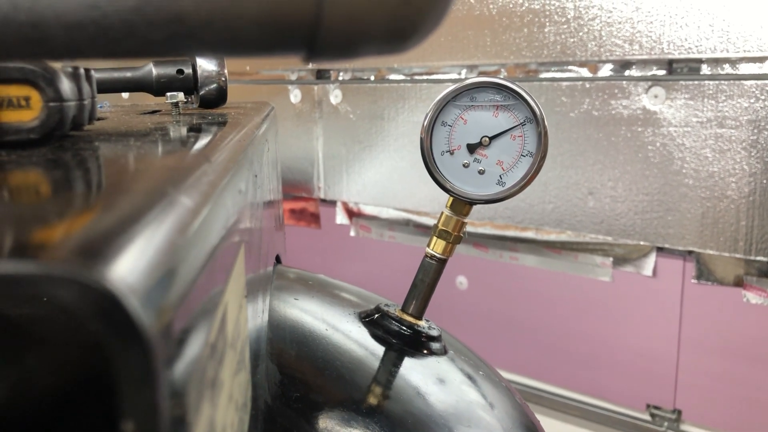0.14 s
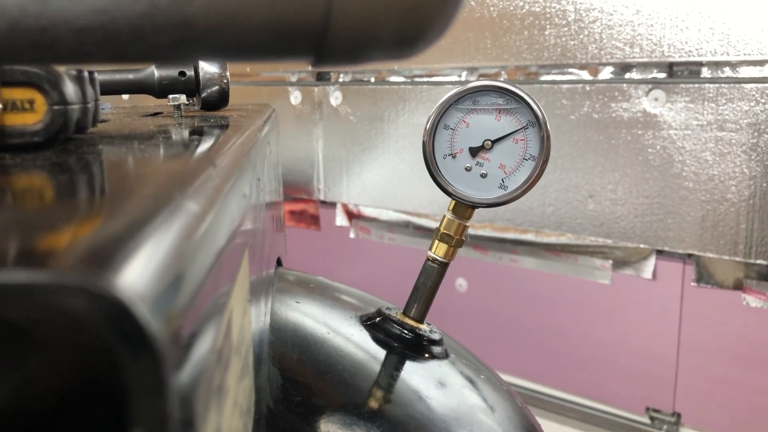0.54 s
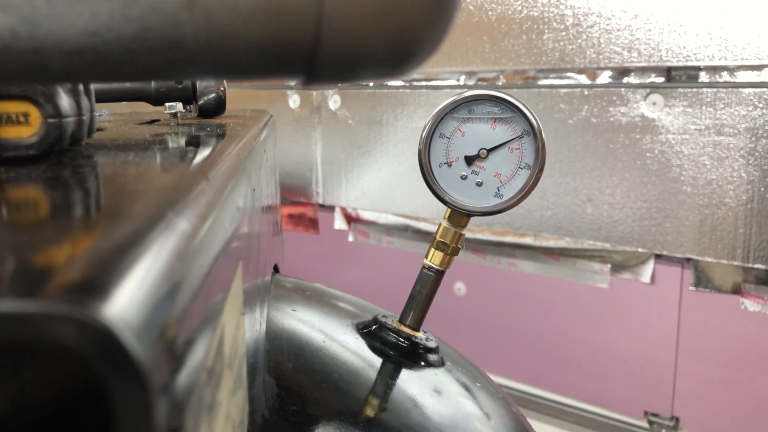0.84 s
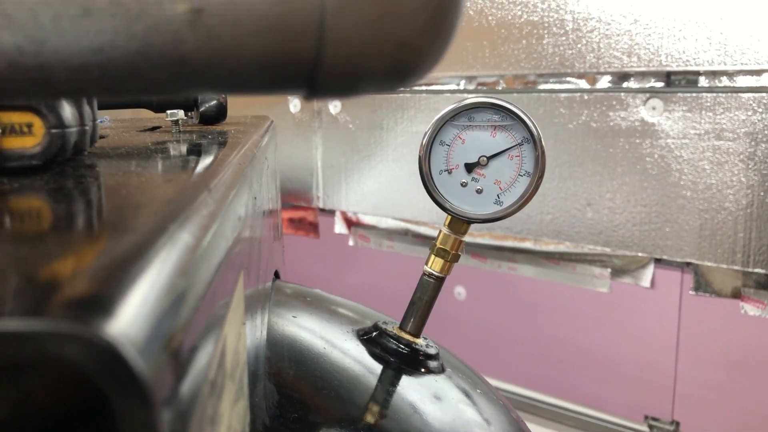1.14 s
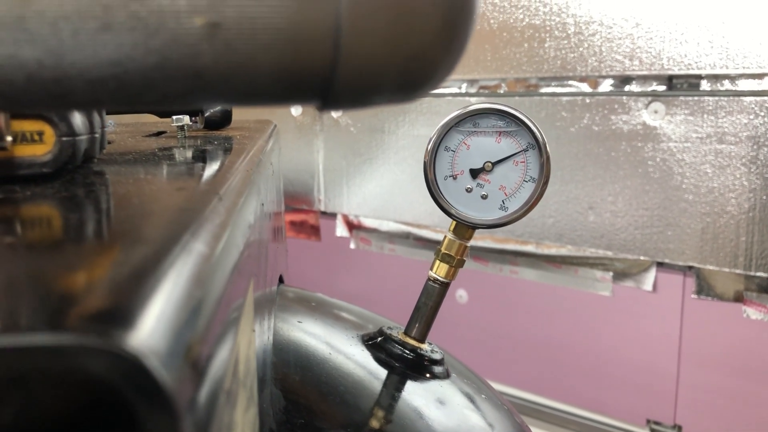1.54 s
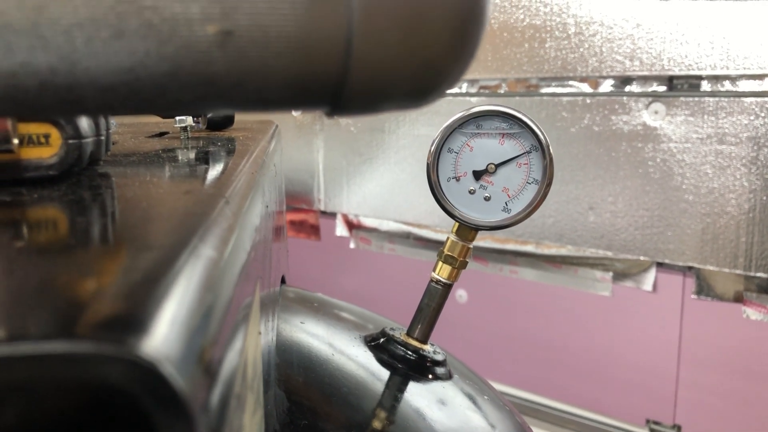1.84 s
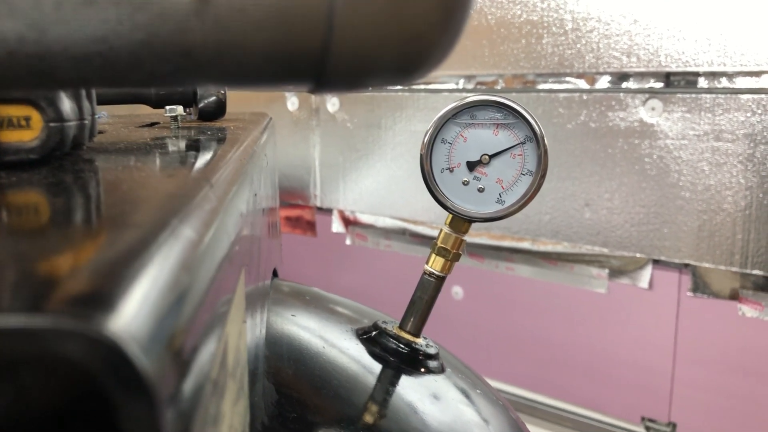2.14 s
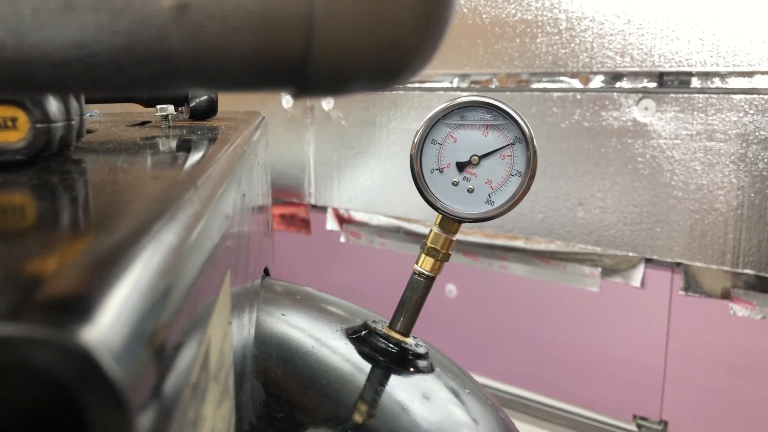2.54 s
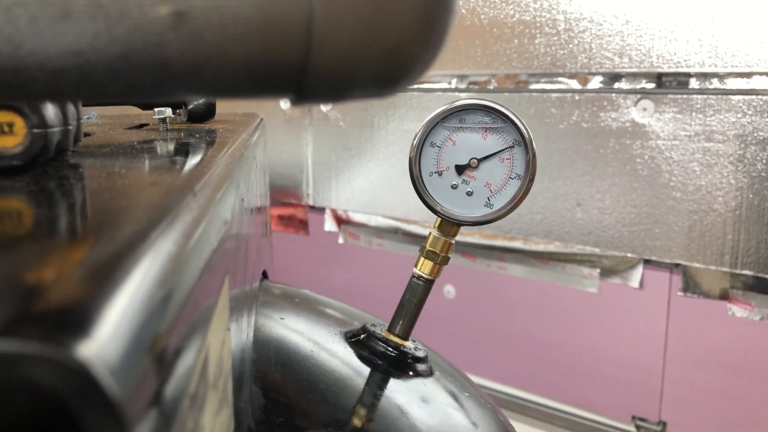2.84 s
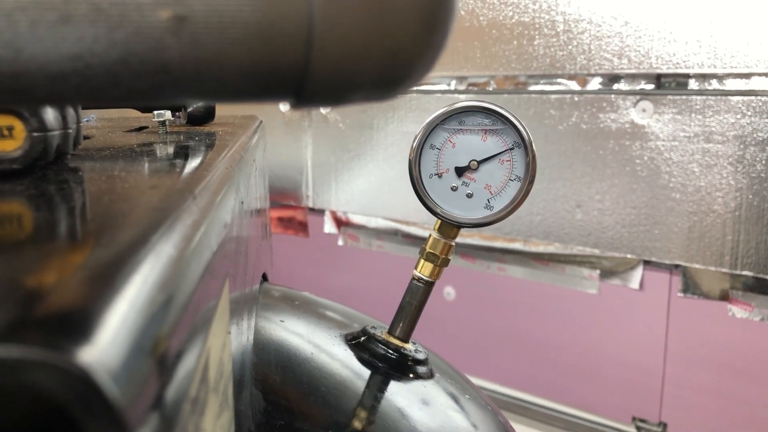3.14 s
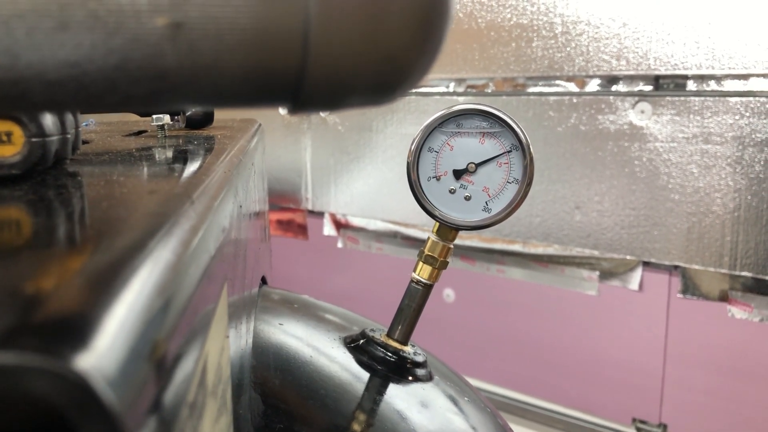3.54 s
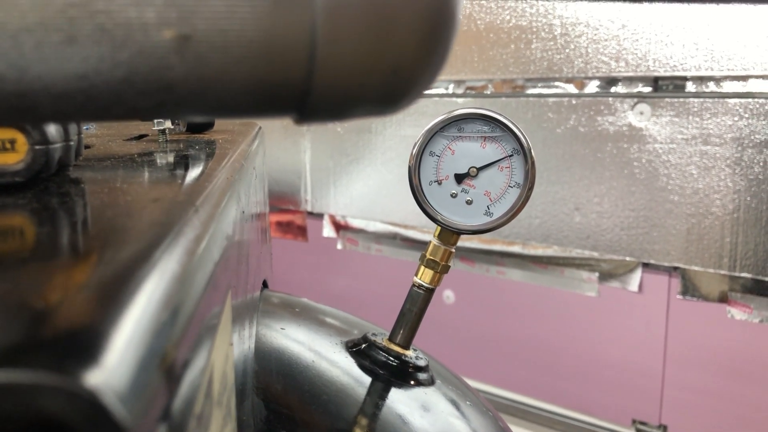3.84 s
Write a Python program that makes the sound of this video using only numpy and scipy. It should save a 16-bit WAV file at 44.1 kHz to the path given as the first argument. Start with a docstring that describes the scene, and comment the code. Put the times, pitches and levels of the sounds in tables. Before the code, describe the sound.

Close electric grease gun pumping nonstop, its high motor whine dipping into gritty clicking strokes.

```python
"""A cordless grease gun pumps without pause in a garage, heard close up.
Its motor whines and hums on multiples of the rotor speed, over a rough whirr.
On each piston stroke the motor sags, and the gears sing and grind under the load.
The housing resonates and rattles, and the piston clicks as it lets go, with a short garage tail."""
import sys
import numpy as np
from scipy import signal
from scipy.fft import rfft, irfft
from scipy.io import wavfile
from scipy.ndimage import uniform_filter1d

SR = 44100
rng = np.random.default_rng(int(sys.argv[2]) if len(sys.argv) > 2 else 0)


def generate_wav(signal):
    """Clip the signal to [-1, 1] and save it as 16-bit WAV at the path in sys.argv[1]."""
    frames = np.transpose(np.atleast_2d(signal))
    scaled = np.clip(frames, -1, 1) * 32767
    pcm = np.round(scaled).astype(np.int16)
    wavfile.write(sys.argv[1], SR, pcm)


N = 176400  # samples: four seconds
T = np.arange(N) / SR


def from_db(db):
    """Turn decibels into gain."""
    return 10 ** (np.asarray(db) / 20)


def rms_one(x):
    """Scale to unit level."""
    return x / np.sqrt(np.mean(x ** 2) + 1e-20)


def drift(rate_hz):
    """Wander slowly and randomly with a spread of 1: noise smoothed by two equal low-pass poles."""
    step = 40  # samples between computed points
    pole = np.exp(-2 * np.pi * rate_hz * step / SR)
    noise = rng.standard_normal(N // step + 2002)
    slow = signal.lfilter([1], [1, -2 * pole, pole * pole], noise)
    slow = rms_one(slow[2000:])  # drop the filter's start-up
    return np.interp(np.arange(N) / step, np.arange(len(slow)), slow)


def colour(x, spectrum):
    """Give white sound of unit level a spectrum in dB per Hz."""
    hz, db = np.transpose(spectrum)
    bins_hz = np.arange(N // 2 + 1) * SR / N
    gain = from_db(np.interp(np.log(bins_hz + 1), np.log(hz), db))
    return irfft(rfft(x) * gain * np.sqrt(SR / 2), N)


def ring(x, hz, t60):
    """Let a unit click set off a mode about 1 high, which fades by 60 dB in t60 seconds."""
    pole, angle = from_db(-60 / (t60 * SR)), 2 * np.pi * hz / SR
    return signal.lfilter([.5, 0, -.5], [1, -2 * pole * np.cos(angle), pole * pole], x + 1e-18)


def resonance(hz, width_hz):
    """Shake one resonance with noise, at unit level."""
    pole, angle = np.exp(-np.pi * width_hz / SR), 2 * np.pi * hz / SR
    noise = rng.standard_normal(N)
    shaken = signal.lfilter([1, 0, -1], [1, -2 * pole * np.cos(angle), pole * pole], noise)
    # keep about an octave on each side
    band = signal.butter(2, [hz / 2, min(hz * 2, SR / 2 - 1)], "band", fs=SR, output="sos")
    return rms_one(signal.sosfilt(band, shaken))


def tone(turns, multiple, waver_db, rough, rough_rate_hz):
    """Sound a partial locked to the rotor, wavering slowly, with a rough skirt of nearby frequencies."""
    phase = 2 * np.pi * (multiple * turns + rng.random())
    skirt = rough * (drift(rough_rate_hz) * np.sin(phase) + drift(rough_rate_hz) * np.cos(phase))
    waver = from_db(waver_db * drift(2.5))
    return rms_one(waver * (np.sin(phase) + skirt))


def drive():
    """Follow the strokes: rotor turns, gear load, and the gains of whine, rattle, gear tones and hum."""
    # The piston strokes. Each row: slowest point in seconds, unloaded rotor speed in Hz (before a
    # slight wobble), change of grinding in dB, change of whine in dB.
    strokes = [(-.059, 344.3, 6, 1), (.545, 345, -2.5, 1.5), (1.149, 343.9, -1, 1.2),
               (1.753, 342.8, 0.5, 1.5), (2.359, 343.7, -1.5, 1), (2.963, 343.2, -1, 1.5),
               (3.569, 342.7, -2, 1), (4.174, 342, 0, 1)]
    # The course of every stroke. Each row: seconds from the slowest point, loss of speed in %,
    # gear load from 0 to 1 (before the stroke's grinding change), then the levels in dB of the
    # whine (before the stroke's change), midrange rattle, gear tones and hum.
    course = [(-.3, 0.1, .05, -0.3, -1, -21, 1), (-.235, .03, .12, -0.5, 3, -17, 1),
              (-.165, 0, 0.13, -0.5, 5, -17, -0.5), (-.148, 0.7, 0.35, -.5, 2, -3, -0.5),
              (-.085, 7, 0.97, -5, 2.5, -1.5, -0.5), (-.035, 10.5, 0.9, -14, 4.5, 2.5, -4.5),
              (.008, 10, .75, -6, 4.5, -5.5, -2), (.035, 8.5, 0.6, -10.5, 2, -3.5, -3.5),
              (.07, 5, .25, -1.5, 4.5, -14.5, -5.5), (.1, 2.5, .03, -2.5, 0.5, -21, -2),
              (.135, 1.24, 0.04, -1.5, 0.5, -11.5, -1), (.22, 0.83, 0.13, -2.5, -2.5, -18, -0.5),
              (.3, 0.28, 0.15, -0.9, -1.5, -17, 0)]
    slowest_s, free_hz, grind_db, stroke_whine_db = np.transpose(strokes)
    nearest = np.abs(T[:, None] - slowest_s).argmin(axis=1)
    since = T - slowest_s[nearest]
    at, *columns = np.transpose(course)
    # a short moving average rounds the corners of each curve
    curves = [uniform_filter1d(np.interp(since, at, column), size=700) for column in columns]
    loss, load, whine_db, rattle_db, mesh_db, hum_db = curves

    speed_hz = np.interp(T, slowest_s, free_hz) * (1 - loss / 100)
    speed_hz = speed_hz * (1 + 0.00062 * drift(37))
    turns = np.cumsum(speed_hz) / SR
    load = np.maximum(load, 0) * from_db(np.interp(T, slowest_s, grind_db))
    whine_db = whine_db + np.interp(T, slowest_s, stroke_whine_db)
    return turns, load, from_db([whine_db, rattle_db, mesh_db, hum_db])


def housing(load, rattle_gain):
    """Shake the shell into its resonances, more or less with load, and rattle the drive along each stroke."""
    # Resonances of the housing. Each row: frequency in Hz, width in Hz, level in dB running free,
    # level in dB added at full load.
    shell_modes = [(125.4, 8.6, -65, -67), (338, 78, -57.5, -47.5), (375, 10, -68, -45.5),
                   (2400, 58, -62, -30.5), (2710, 55, -62, -38), (2786, 45, -46, -35.5),
                   (3465, 20, -40.5, -42), (4360, 65, -40.5, -56), (5530, 48, -43.5, -45),
                   (5700, 130, -38.5, -53), (8330, 250, -38, -58), (14600, 120, -60, -41),
                   (15520, 280, -50, -31)]
    # The rattle of the drive. Each row: frequency in Hz, width in Hz, level in dB before the
    # course of the stroke.
    rattle_modes = [(798.2, 14.5, -42.5), (1188, 30, -46), (1513, 43, -43.5), (1706, 210, -40.5),
                    (2126, 64, -38.5), (2295, 160, -37)]
    shell = np.zeros(N)
    for hz, width_hz, free_db, loaded_db in shell_modes:
        level = np.hypot(from_db(free_db), load * from_db(loaded_db))  # the two powers add
        shell += level * resonance(hz, width_hz)
    rattle = sum(from_db(db) * resonance(hz, width_hz) for hz, width_hz, db in rattle_modes)
    return shell + rattle_gain * rattle


def piston():
    """Click sharply as the piston lets go: a blow rings metal modes, with a short tail from the garage."""
    # The piston lets go. Each row: earliest time of the blow in seconds, level in dB,
    # extra level of its low knock in dB.
    clicks = [(0.0157, -3, 2.5), (.6205, -2.5, 7), (1.2245, -4.5, 10.5), (1.8283, 0, -5), (2.4344, -4, 5.5),
              (3.0405, -0.5, 4), (3.6465, -2, 2.5)]
    # The ring of the click. Each row: frequency in Hz, level in dB, time to fade by 60 dB in seconds.
    click_modes = [(870, -21.5, 0.013), (1310, -24, 0.029), (1793, -18.5, 0.013), (2770, -9.5, 0.0079),
                   (4070, -13.5, 0.027), (4900, -7, 0.0027), (6300, -11, 0.0072), (8400, -10.5, 0.0041),
                   (10800, -18, .004)]
    spread_s = .0012  # the blow reaches the modes at slightly different moments
    scatter_db, knock_below_hz = 1.2, 2200
    room_db, garage_t60_s = -37, 0.18

    start_s, db, knock_db = np.transpose(clicks)
    out = np.zeros(N)
    for k, (hz, mode_db, t60) in enumerate(click_modes):
        hit_s = start_s + spread_s * rng.random(len(start_s))
        hit_db = db + mode_db + knock_db * (hz < knock_below_hz)
        hit_db = hit_db + rng.normal(0, scatter_db, len(start_s))
        hits = np.zeros(N)
        hits[(hit_s * SR).astype(int)] = from_db(hit_db)
        out += (-1) ** k * ring(hits, hz, t60)  # neighbouring modes start in opposite directions
    tail = rng.standard_normal(SR // 2) * from_db(-60 * T[:SR // 2] / garage_t60_s)
    return out + from_db(room_db) * signal.fftconvolve(out, tail)[:N]


def gears(turns, load, mesh_gain):
    """Meshing tones leap up as the piston bites; a dense rattle of tooth contacts grows with the load."""
    # Tones of the meshing gears. Each row: multiple of rotor speed, level in dB before the course
    # of the stroke, roughness from 0 to 1.
    mesh_tones = [(1.22, -46, 0.3), (2.576, -56, 0), (6.88, -40.5, 0.3), (7.7, -45, 0.6), (8.62, -36.5, .4),
                  (9.59, -30, .15), (10.25, -25, .08), (11.3, -37, 0.2), (17.13, -47, .3), (19.6, -50, .2),
                  (20.5, -48, 0.4), (30.2, -41.5, 0.35), (39.7, -47, .2), (40.4, -49, .2)]
    # Teeth grinding at full load. Each row: frequency in Hz, level in dB per Hz.
    grind_spectrum = [(60, -100), (200, -78.5), (350, -64.5), (470, -72), (750, -63.5), (1100, -70),
                      (1700, -65), (2350, -57), (3000, -58.5), (3700, -55.5), (4500, -70.5), (6700, -65.5),
                      (8700, -79), (9400, -66), (11300, -67), (13200, -76), (14500, -70), (15700, -70)]
    mesh = sum(from_db(db) * tone(turns, multiple, waver_db=1.4, rough=rough, rough_rate_hz=34)
               for multiple, db, rough in mesh_tones)
    hit = rng.random(N) < 6000 / SR  # about 6000 contacts a second
    contacts = hit * rng.standard_normal(N) * from_db(2.4 * drift(325))
    return mesh_gain * mesh + load * colour(rms_one(contacts), grind_spectrum)


def motor(turns, load, whine_gain, hum_gain):
    """Commutator whine, a low hum that growls under load, and a whirr that throbs with each turn."""
    # Motor whine. Each row: multiple of rotor speed, level in dB before the course of the stroke.
    whine_tones = [(9, -36.5), (12, -23), (13, -40), (15, -40.5), (18, -42.5), (21, -51), (22, -44.5),
                   (23, -52), (24, -32.5), (25, -36), (27, -45), (28, -55), (30, -46.5), (31, -58),
                   (33, -47), (35, -46), (36, -40.5), (37, -44), (44, -54)]
    # Rotor hum. Each row: multiple of rotor speed, level in dB running free, level in dB under
    # full load, both before the course of the stroke.
    hum_tones = [(.75, -52, -58), (1, -39, -35.5), (2, -52.5, -79), (3, -34.5, -38), (4, -42.5, -49.5),
                 (6, -48.5, -38.5)]
    # Brushes, bearings and fan. Each row: frequency in Hz, level in dB per Hz.
    whirr_spectrum = [(25, -106), (55, -89), (100, -85), (130, -78), (200, -71.5), (260, -69.5),
                      (450, -73.5), (650, -70), (950, -68.5), (1250, -68), (1600, -61), (1950, -65),
                      (2300, -68.5), (2650, -68), (3800, -63), (4250, -65.5), (4700, -67), (5100, -64.5),
                      (6100, -64.5), (7000, -66), (8000, -64), (8600, -68), (8850, -69.5), (9400, -67.5),
                      (10400, -67.5), (11000, -72), (13500, -71), (15700, -72.5)]
    throb_db = .5
    whine = sum(from_db(db) * tone(turns, multiple, waver_db=1.0, rough=0.087, rough_rate_hz=70)
                for multiple, db in whine_tones)
    growl = 0.029 + 0.26 * load  # the load roughens the hum
    hum = np.zeros(N)
    for multiple, free_db, loaded_db in hum_tones:
        level = from_db(free_db + (loaded_db - free_db) * load)
        hum += level * tone(turns, multiple, waver_db=1.17, rough=growl, rough_rate_hz=55)
    throb = from_db(throb_db * np.sin(2 * np.pi * turns) + 1.0 * drift(170))
    whirr = colour(rms_one(throb * rng.standard_normal(N)), whirr_spectrum)
    return whine_gain * whine + hum_gain * hum + whirr


def scene():
    """Add the parts of the gun and place it dead centre."""
    turns, load, (whine_gain, rattle_gain, mesh_gain, hum_gain) = drive()
    gun = housing(load, rattle_gain) + piston()
    gun += gears(turns, load, mesh_gain)
    gun += motor(turns, load, whine_gain, hum_gain)
    return np.array([gun, gun])


def record(dry):
    """Cut the top steeply above 15.7 kHz."""
    low_pass = signal.ellip(12, .2, 80, 15700, fs=SR, output="sos")  # .2 dB ripple, 80 dB cut
    return signal.sosfilt(low_pass, dry)


dry = scene()
out = record(dry)
generate_wav(out)
```